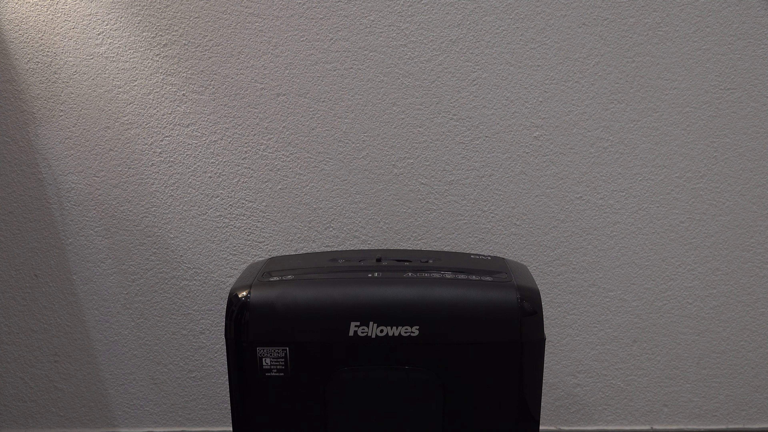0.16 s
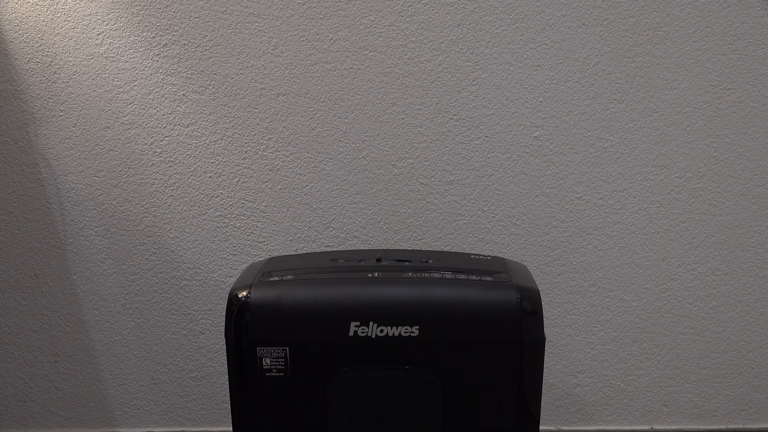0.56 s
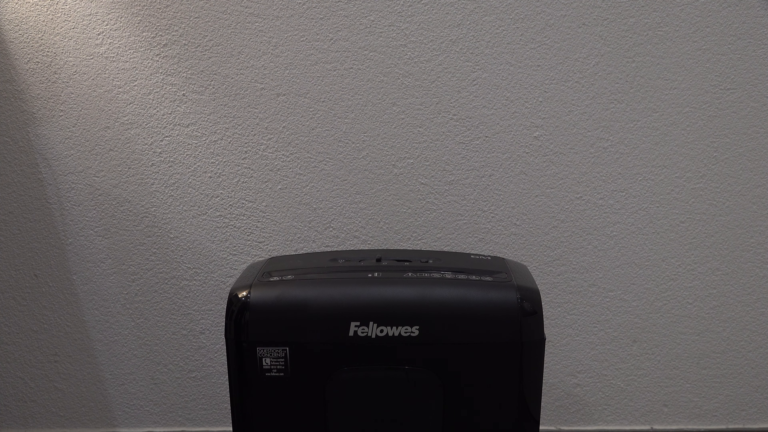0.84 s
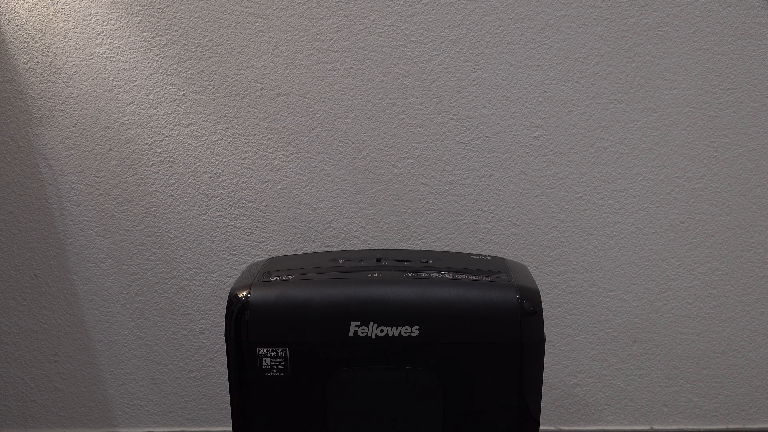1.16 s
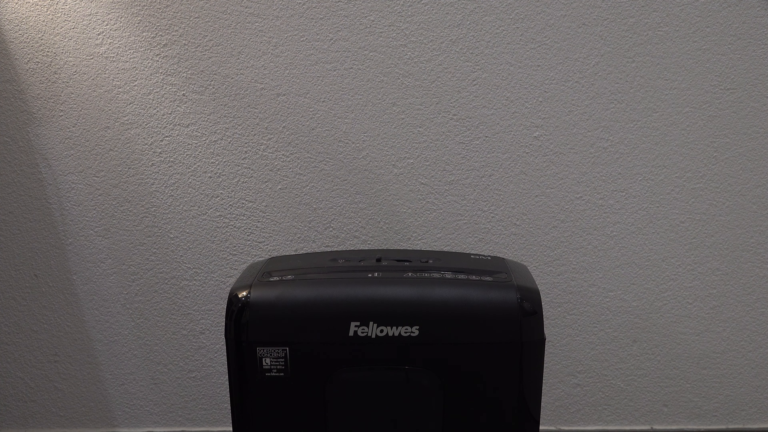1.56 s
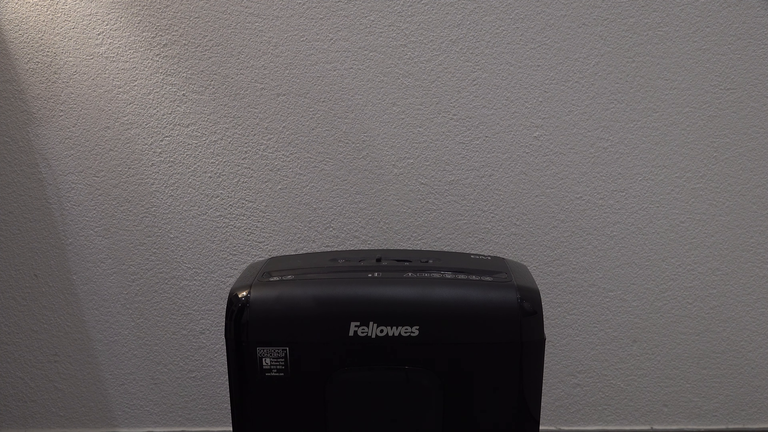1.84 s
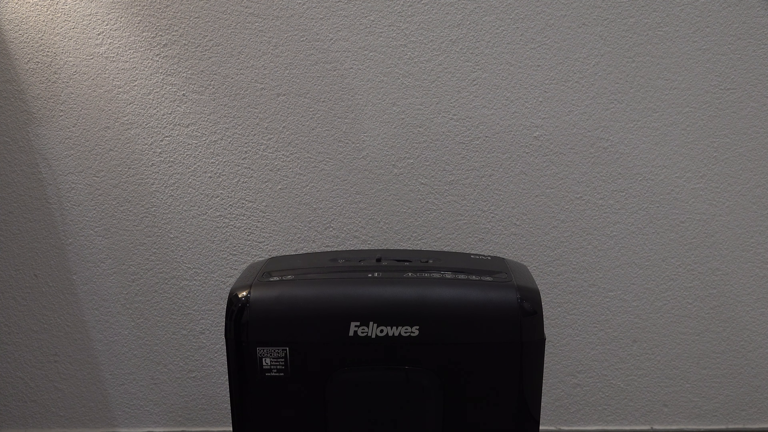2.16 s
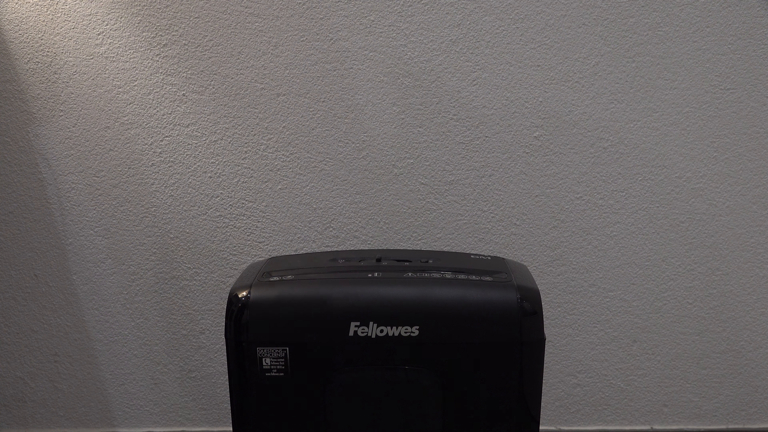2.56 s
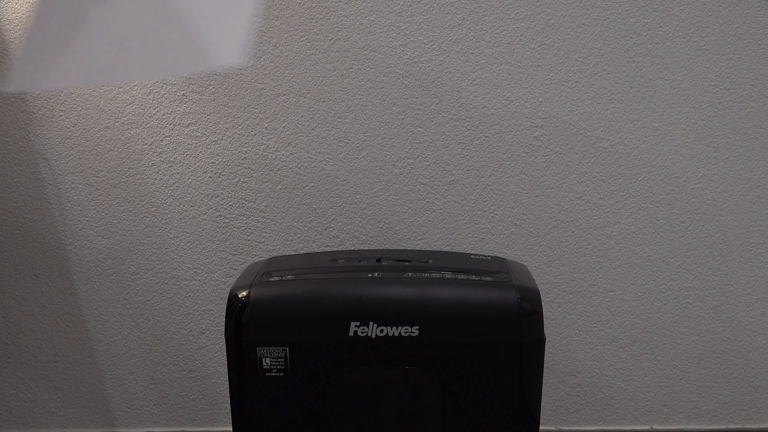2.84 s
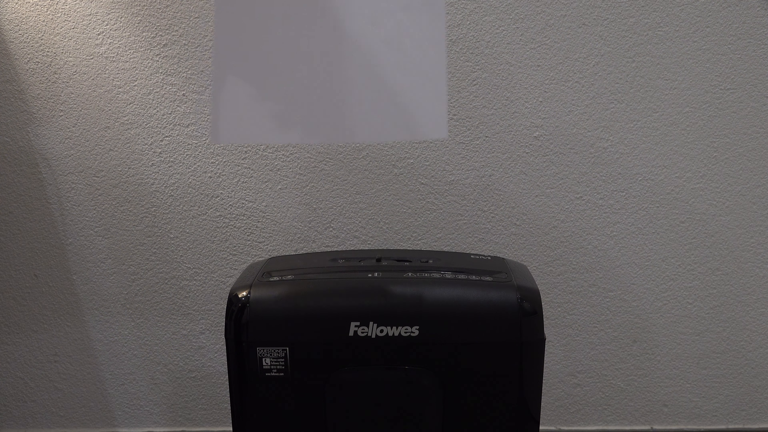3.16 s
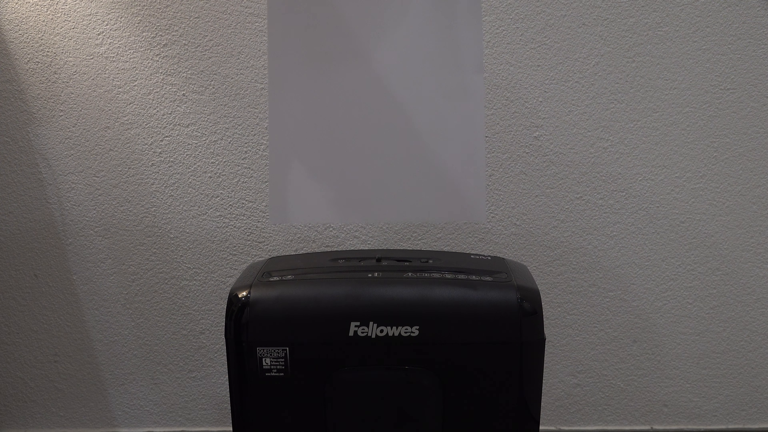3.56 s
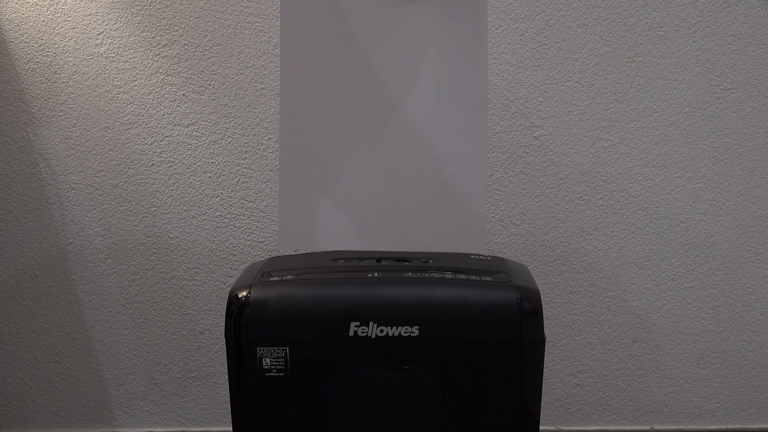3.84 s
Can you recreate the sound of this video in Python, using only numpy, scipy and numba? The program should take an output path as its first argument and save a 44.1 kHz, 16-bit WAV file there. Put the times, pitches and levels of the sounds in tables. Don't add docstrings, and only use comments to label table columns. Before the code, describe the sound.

An electric paper shredder whirs loudly and steadily close to the microphone in a small hard room, switches off, drops in pitch to a ticking stop, then soft paper slides and hollow box knocks follow.

```python
import sys
import numpy as np
from scipy import signal
from scipy.fft import rfft, irfft
from scipy.io import wavfile
from scipy.ndimage import uniform_filter1d
from numba import njit

SR = 44100
rng = np.random.default_rng(int(sys.argv[2]) if len(sys.argv) > 2 else 0)


def gain_from_decibels(decibels):
    exponent = np.asarray(decibels, float) / 20
    return 10 ** exponent


def transcribe(signal):
    frames = np.atleast_2d(signal).T
    limited = np.clip(frames, -1, 1)
    pcm = np.round(limited * 32767).astype(np.int16)
    wavfile.write(sys.argv[1], SR, pcm)


N = 176400
MID_TO_SIDE = np.array([[1], [-1]])


def at_rms(x, db):
    return x * gain_from_decibels(db) / np.sqrt(np.mean(x ** 2))


@njit
def svf(x, hz, width_hz):
    y, band, low = np.empty(len(x)), 0., 0.
    g, k = np.tan(np.pi * hz / SR), width_hz / hz
    for i in range(len(x)):
        v = (band + g * (x[i] + 1e-18 - low)) / (1 + g * (g + k))
        band, low, y[i] = 2 * v - band, low + 2 * g * v, k * v
    return y


def walk(rate_hz):
    k = int(SR / rate_hz)
    held = np.repeat(rng.standard_normal(N // 200)[:N // k + 1], k)
    return 1.3 * uniform_filter1d(uniform_filter1d(held, k), k)[:N]


def log_bins():
    return np.log(np.maximum(np.arange(N // 2 + 1) * SR / N, 10))


def colour(x, points, tilt_db_oct=0.):
    f, p = log_bins(), np.array(points)
    octaves = np.maximum(f - np.log(700), 0) / np.log(2)
    gain_db = np.interp(f, np.log(p[:, 0]), p[:, 1]) + tilt_db_oct * octaves
    return irfft(rfft(x) * gain_from_decibels(gain_db), N)


def window(t, start_s, length_s, edge):
    u = (t - start_s) / length_s
    return np.clip(u / edge, 0, 1) * np.clip((1 - u) / (1 - edge), 0, 1) ** .5


# frequency in Hz, level in dB per Hz.
FLOOR_SPECTRUM = [(30, -19.5), (50, -9.5), (120, -23), (270, -22), (430, -31.5), (1200, -34), (2500, -44),
                  (15500, -50)]
# frequency in Hz, side relative to mid in dB.
FLOOR_WIDTH = [(60, -28.5), (300, -13), (1000, 0.5), (4000, 0.5), (12000, -5.5)]


def room_floor(t):
    mid = colour(rng.standard_normal(N), FLOOR_SPECTRUM)
    side = colour(colour(rng.standard_normal(N), FLOOR_SPECTRUM), FLOOR_WIDTH)
    tone = (mid + side * MID_TO_SIDE) * gain_from_decibels(-52.5) / mid.std()
    fan_hz, fan_width_hz, fan_db = 26., 4., -51
    fan = at_rms(svf(svf(rng.standard_normal(N), fan_hz, fan_width_hz), fan_hz, 12.), fan_db)
    whine_hz, whine_db = 5421, -77
    whine = gain_from_decibels(whine_db + 1.7 * walk(20)) * np.sqrt(2) * np.sin(2 * np.pi * whine_hz * t)
    return tone + fan + whine


@njit
def walls(x, lags, gain, damp):
    line, soft, out = np.zeros((8, 4096)), np.zeros(8), np.zeros((2, len(x)))
    for i in range(len(x)):
        total = 0.
        for k in range(8):
            soft[k] += (1 - damp) * (gain[k] * line[k, (i - lags[k]) & 4095] - soft[k])
            total += soft[k]
            out[k % 2, i] += soft[k]
        for k in range(8):
            line[k, i & 4095] = x[i] + 1e-18 + soft[k] - total / 4
    return out


# frequency in Hz, side level in dB.
ROOM_WIDTH = [(60, -29.5), (250, -12), (700, -5), (2000, -6.5), (4500, -9), (8000, 2), (13000, -2)]


def room(x):
    t60_s, damp = 0.58, 0.35
    lags = np.array([509, 701, 887, 1093, 1327, 1601, 1871, 2203])
    mid, side = walls(x, lags, gain_from_decibels(-60 * lags / SR / t60_s), damp) / 2
    return mid + colour(side, ROOM_WIDTH) * MID_TO_SIDE


# start in seconds, push length in seconds, level in dB, dullness in Hz.
KNOCKS = [
    (2.179, .016, -39.5, 1210),
    (2.19, 0.044, -42, 2962),
    (2.416, .035, -45, 2480),
    (2.444, 0.054, -42, 1700),
    (2.5, 0.099, -53.5, 1480),
]
# frequency in Hz, level in dB, t60 in seconds.
BOX_MODES = [(178, 3, .1), (367, 10.5, 0.2), (520, -0.5, 0.083), (775, 4, 0.041), (960, -20, 0.067),
             (1090, -3, 0.044), (1140, -3, 0.099), (1493, -2.5, 0.071), (2300, -22, 0.062),
             (2850, -28, 0.069)]


def box(t):
    rough = rng.standard_normal(N) * gain_from_decibels(2.8 * walk(190))
    push = 0
    for start_s, push_s, db, dull_hz in KNOCKS:
        band = signal.butter(2, [290, dull_hz], "band", fs=SR, output="sos")
        dull = signal.sosfilt(band, rough)
        push = push + window(t, start_s, push_s, 0.11) * at_rms(dull, db)
    out = gain_from_decibels(-3) * push
    for hz, db, t60_s in BOX_MODES:
        out = out + gain_from_decibels(db + 7) * svf(push, float(hz), 6.6 / t60_s)
    return out


# start in seconds, length in seconds, level in dB, centre in Hz.
PAPER = [
    (.505, 0.071, -19, 2800),
    (1.9, 0.054, -47.5, 2300),
    (2.016, 0.22, -52, 4750),
    (2.348, .05, -65, 3970),
    (2.463, .06, -67, 4200),
    (2.91, 0.024, -62, 5070),
    (3.05, 0.17, -63.5, 4500),
]


def paper(t):
    grain = rng.standard_normal(N) * gain_from_decibels(2.8 * walk(150))
    out = 0
    for start_s, length_s, db, hz in PAPER:
        hiss = svf(svf(grain, float(hz), float(hz)), float(hz), 1.157 * hz)
        out = out + gain_from_decibels(db) * window(t, start_s, length_s, 1 / 3) * at_rms(hiss, 0)
    return out


def mains_hum(t, off):
    hum_hz, hum_db = 100.6, -40.5
    return gain_from_decibels(hum_db + 1.3 * walk(11)) * np.sqrt(2) * np.sin(2 * np.pi * hum_hz * t) * (1 - off)


# start in seconds, level in dB.
TICKS = [
    (1.889, -36),
    (1.913, -35),
    (1.93, -42),
]


def gear_ticks(t, noise):
    click = svf(noise, 2500., 4000.)
    return sum(gain_from_decibels(db) * window(t, start_s, 1 / 300, 1 / 8) * click for start_s, db in TICKS)


# frequency in Hz, level in dB per Hz.
RATTLE = [(60, -28), (140, -21), (300, -13.5), (1100, -8), (5700, -10.5), (6700, -23), (10000, -26.5),
          (15500, -40.5)]


def gear_rattle(noise, hz):
    bright, dark = colour(noise, RATTLE), colour(noise, RATTLE, tilt_db_oct=-7)
    slow = np.clip(1 - hz / hz.max(), 0, 1)
    return (bright * (1 - slow) + dark * slow) / bright.std()


# multiple of the shaft speed, level in dB.
ORDERS = [(1, -4.5), (2, -8), (3, -2), (4, 0), (5, -12), (7, -13.5), (8, 0.5), (10, -10.5), (12, -9),
          (16, -7.5), (19, -22), (20, -7), (27, -21)]


def shaft_tones(turn, off):
    teeth, teeth_coast_db, other_coast_db = 8, 3.5, -10.5
    gear_ratio, gear_depth = 9.1, 0.34
    waver_db, waver_hz, coast_waver_db = 3.5, 9.75, 4.5
    tones = 0
    for order, order_db in ORDERS:
        phase = 2 * np.pi * rng.random()
        throb = 1 + gear_depth * np.exp(1j * (turn / gear_ratio + phase))
        coast_db = teeth_coast_db if order == teeth else other_coast_db
        db = order_db + coast_db * off + waver_db * walk(waver_hz) + coast_waver_db * off * walk(45)
        tones = tones + gain_from_decibels(db) * (throb * np.exp(1j * order * turn)).imag
    return tones


# frequency in Hz, width in Hz, level in dB.
HOUSING = [(92, 20, -3), (170, 31, 7), (315.7, 33, 5), (544, 40, -0.5), (705, 47, -3), (916, 60, -5.5),
           (1065, 55, 3.5), (1457, 24, -1.5), (1628, 70, -2.5), (1864, 47, 5.5), (5440, 300, -3.5),
           (7816, 55, 15), (8510, 300, 6), (9690, 440, -3)]


def housing(drive):
    return drive + sum(gain_from_decibels(db) * svf(drive, float(hz), float(width_hz)) for hz, width_hz, db in HOUSING)


# time in seconds, shaft speed in Hz, rattle level in dB, harmonics above rattle in dB.
MOTOR = [(0, 266.5, -23.5, -4), (.15, 272.5, -24.5, 0.5), (.33, 275.8, -23.5, -0.5), (.5, 282.5, -24, -2.5),
         (.75, 284, -24, 0), (.92, 285.4, -24.5, 3.5), (1.05, 285.7, -24.5, -0.5), (1.2, 284.8, -25, 3),
         (1.275, 288.2, -24, 3), (1.335, 252, -24.5, -6), (1.385, 232.6, -24.5, -0.5),
         (1.46, 205.3, -25.5, -3), (1.55, 176.3, -28, -4), (1.625, 141.2, -27.5, 3), (1.7, 114.9, -27, -2),
         (1.78, 92, -35, -5), (1.88, 60, -36, -20)]


def motor(t):
    off_s, off_fade_s, fade_s, fade_db = 1.289, 0.041, 1.96, -38.5
    rest = [(fade_s, 40, fade_db, -30), (fade_s + 0.18, 30, -90, -30)]
    rows = np.array(list(MOTOR) + rest)
    hz, db, lift_db = (np.interp(t, rows[:, 0], col) for col in rows.T[1:])
    jitter = 0.00303
    turn = 2 * np.pi * np.cumsum(hz * (1 + jitter * walk(40.42))) / SR
    off = np.clip((t - off_s) / off_fade_s, 0, 1)
    tones = shaft_tones(turn, off)
    gate = 1 + 0.19 * np.cos(turn)
    noise = rng.standard_normal(N) * gate * gain_from_decibels(.6 * walk(29.86))
    rattle_db, tone_db = 1, -3.5
    drive = gain_from_decibels(db) * (gain_from_decibels(rattle_db) * gear_rattle(noise, hz) + gain_from_decibels(tone_db + lift_db) * tones)
    return housing(drive + gear_ticks(t, noise)) + mains_hum(t, off)


# frequency in Hz, left's lead in radians.
PORT_LEAD = [(100, 0), (780, -0.9), (2240, -0.5), (5340, 0.3), (7240, 0.2), (8700, -0.5), (11500, -1.2),
             (15200, 0)]
# frequency in Hz, left minus right in dB.
PORT_DB = [(60, 3), (700, -1.5), (1290, -3.5), (2380, -3), (4400, -3.5), (8120, -1), (15000, 0)]


def ports(x):
    def half_difference(table):
        rows = np.array(table)
        return np.interp(log_bins(), np.log(rows[:, 0]), rows[:, 1]) / 2

    left = gain_from_decibels(half_difference(PORT_DB)) * np.exp(1j * half_difference(PORT_LEAD))
    return irfft(rfft(x) * np.array([left, 1 / left]), N)


def scene():
    t = np.arange(N) / SR
    machine, knocks = motor(t) + paper(t), box(t)
    machine_room_db, box_room_db, box_pan_db = -7, -6.5, 2.9
    wet = room(gain_from_decibels(machine_room_db) * machine + gain_from_decibels(box_room_db) * knocks)
    box_pan = gain_from_decibels(box_pan_db / 2 * MID_TO_SIDE)
    return ports(machine) + knocks * box_pan + wet + room_floor(t)


def band_limit(x):
    return signal.sosfilt(signal.butter(12, 15630, fs=SR, output="sos"), x)


def record(dry):
    return band_limit(dry)


dry = scene()
out = record(dry)
transcribe(out)
```